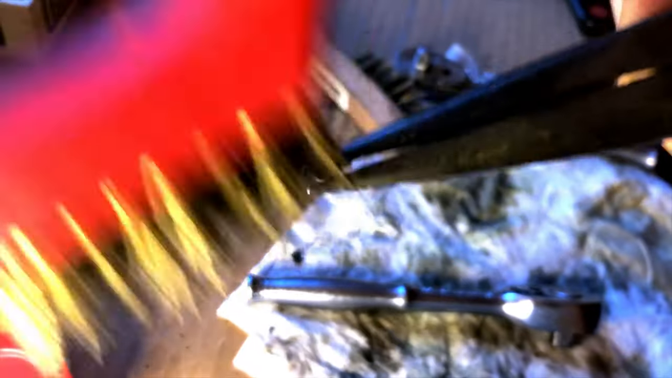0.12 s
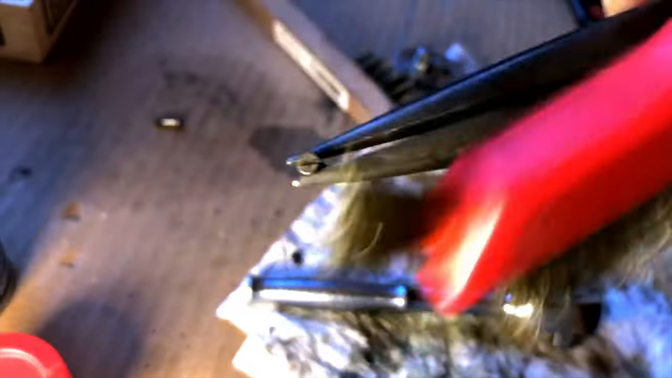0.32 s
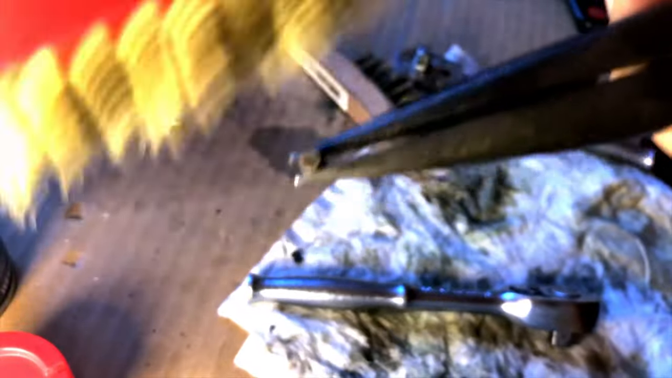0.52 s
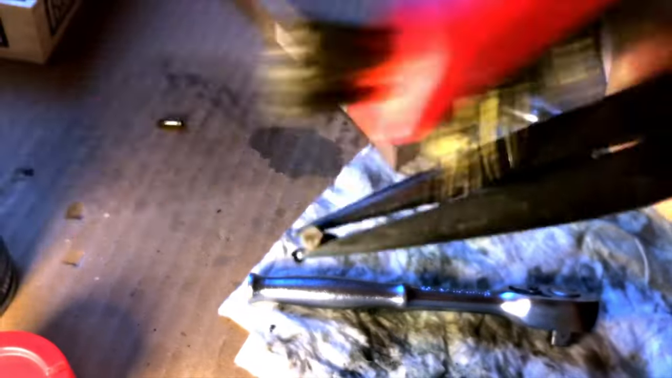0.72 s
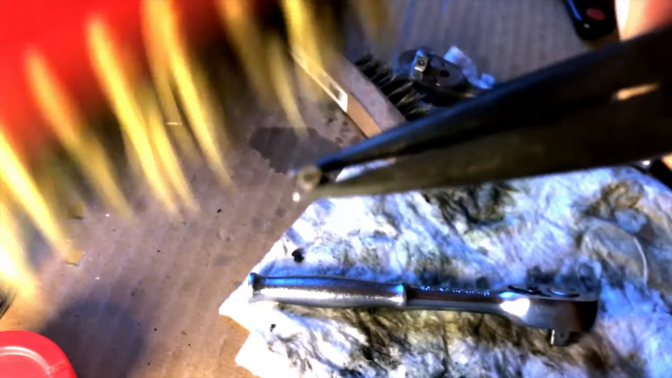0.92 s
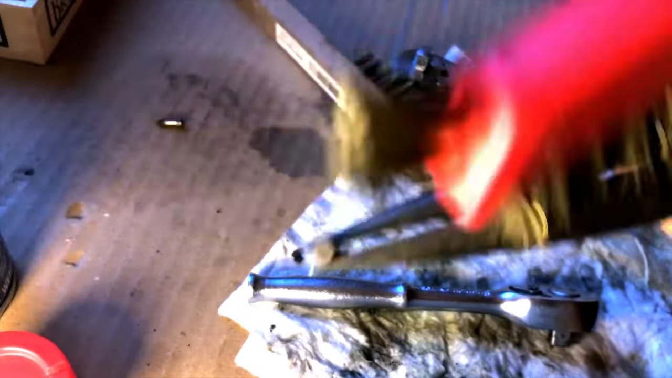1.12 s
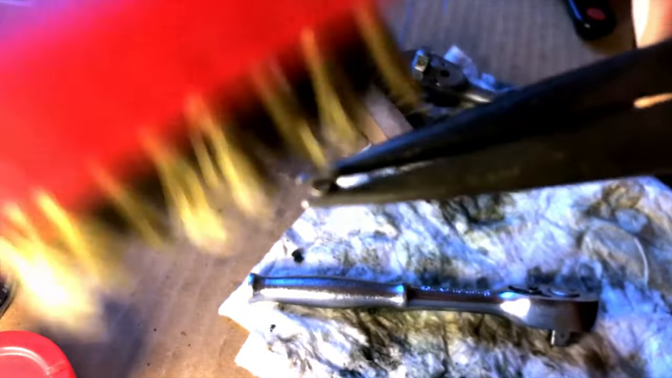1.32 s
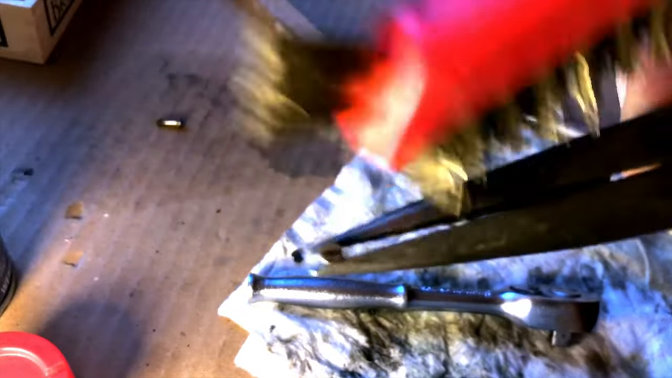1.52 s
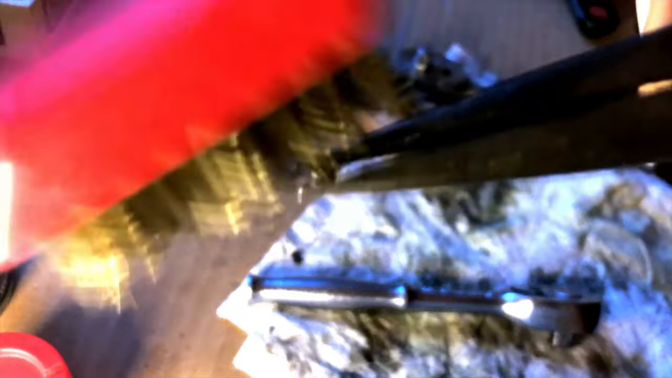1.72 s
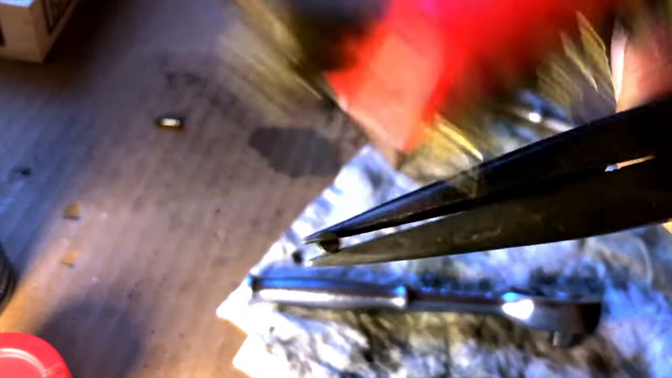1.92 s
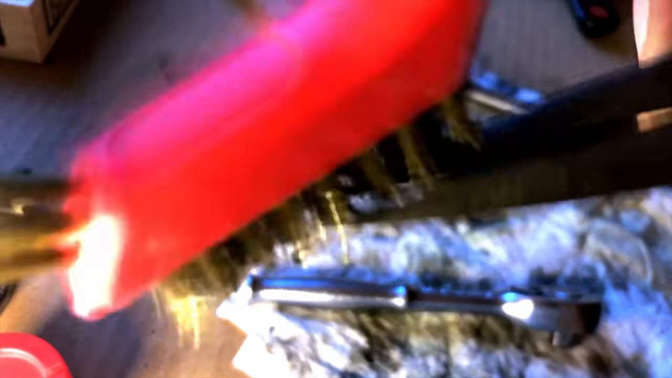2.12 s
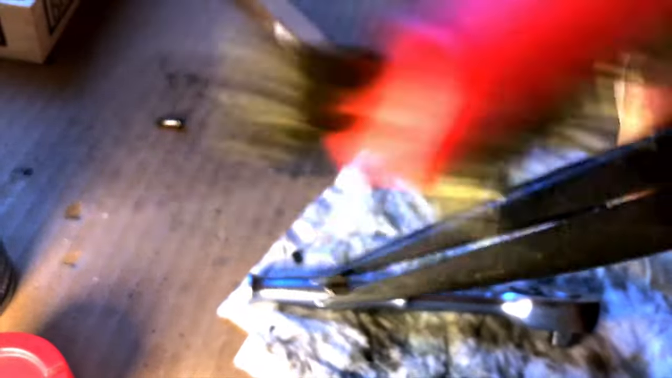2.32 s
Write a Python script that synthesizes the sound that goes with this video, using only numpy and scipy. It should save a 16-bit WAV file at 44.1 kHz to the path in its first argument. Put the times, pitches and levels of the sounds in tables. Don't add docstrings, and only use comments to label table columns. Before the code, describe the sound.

Close, dry scratching of brass wire bristles on a small metal screw: a weak first graze, a sharp handle click, then five even raspy strokes, each starting with a slap and knock, in a quiet workshop.

```python
import sys
import numpy as np
from scipy import signal
from scipy.fft import rfft, irfft, next_fast_len
from scipy.io import wavfile
from scipy.ndimage import uniform_filter1d, map_coordinates

SR = 44100
rng = np.random.default_rng(int(sys.argv[2]) if len(sys.argv) > 2 else 0)


def master_out(mix):
    frames = np.transpose(np.atleast_2d(mix))
    ceiling = np.clip(frames, -1, 1)
    pcm = np.round(ceiling * 32767).astype(np.int16)
    wavfile.write(sys.argv[1], SR, pcm)


def linear_from_db(decibels):
    return 10 ** (np.asarray(decibels, float) / 20)


N = 110250
T_S = np.arange(N) / SR


def unit(x):
    return x / np.sqrt(np.mean(x ** 2) + 1e-20)


def filtered(x, response):
    size = next_fast_len(N + SR // 2)
    spectrum = rfft(x, size) * response(np.fft.rfftfreq(size, 1 / SR))
    return irfft(spectrum, size)[:N]


def colour(points):
    freq_hz, level_db = np.transpose([(5, -120), *points, (SR, -120)])
    return lambda hz: linear_from_db(np.interp(np.log(hz + 1), np.log(freq_hz), level_db))


def noise(points):
    return unit(filtered(rng.standard_normal(N), colour(points)))


def body(peaks):
    def response(f):
        total = 0
        for k, (freq_hz, width_hz, level_db) in enumerate(peaks):
            damping = 1j * f * width_hz
            total = total + (-1) ** k * linear_from_db(level_db) * damping / (freq_hz ** 2 - f * f + damping)
        return total
    return response


def wobble(rate_hz):
    return map_coordinates(rng.standard_normal(N // 10), [np.arange(N) * rate_hz / SR])


def snaps(rate_hz, spread_db, biggest=3.5):
    slips = rng.random(N) < rate_hz / SR
    size = np.minimum(rng.exponential(size=N), biggest)
    sign = np.sign(rng.standard_normal(N))
    return unit(slips * linear_from_db(spread_db * size) * sign)


def pressure(tables):
    return sum(linear_from_db(np.interp(T_S, *np.transpose(rows), left=-200, right=-200)) for rows in tables)


# freq_hz, level_db (per Hz)
RUMBLE = [(25, -38), (60, -12.5), (85, -21.5), (150, -1.5), (260, -6), (340, -9.5), (480, -21), (700, -29)]
HISS = [(500, -44.5), (800, -2.5), (1050, 1.5), (1350, 2), (1700, -7.5), (2500, -13.5), (5000, -22.5),
        (16000, -31.5)]


def air():
    rumble_db = -43.5 + 1.17 * wobble(8.9)
    hiss_db = -56 + 1.8 * wobble(1.7)
    return linear_from_db(rumble_db) * noise(RUMBLE) + linear_from_db(hiss_db) * noise(HISS)


# start_s, length_s, tips_db, shank_db
LANDINGS = [(0.1508, 0.0032, -42, -51), (0.1565, 0.01, -45, -48), (0.328, 0.0025, -56, -46),
            (0.364, 0.0094, -57.5, -52.5), (0.592, 0.0099, -32.5, -39), (0.605, 0.0032, -48, -40),
            (0.9944, 0.0018, -35.5, -30.5), (0.9964, 0.0075, -32, -25.5), (1.3716, 0.0085, -30, -36),
            (1.7369, 0.0065, -29, -46), (1.761, 0.0066, -35, -55), (2.129, 0.0069, -20.5, -22)]
# freq_hz, level_db
TIPS = [(3000, -20), (6000, -7.5), (8000, -9), (10000, -2), (12000, -6), (16500, -18.5)]
# freq_hz, level_db
SHANK = [(600, -25.5), (1500, -17), (3200, 7), (4500, -13), (6000, 4), (9000, -14)]
# freq_hz, width_hz, level_db
WIRES = [(1300, 220, 8), (3200, 900, -10.5), (4200, 300, 2), (5850, 860, 2), (6520, 200, -9.5),
         (7430, 170, 1), (8140, 650, 1.5), (9250, 270, 3.5), (9850, 280, 5.5), (11050, 300, 2),
         (11600, 430, -2.5), (13000, 400, -4.5), (14400, 430, 0.5)]


def slaps():
    tips, shank = np.zeros(N), np.zeros(N)
    for start_s, length_s, tips_db, shank_db in LANDINGS:
        progress = np.clip((T_S - start_s) / length_s, 0, 1)
        swell = np.sin(np.pi * progress ** 1.4) ** 2
        tips += linear_from_db(tips_db) * swell
        shank += linear_from_db(shank_db) * swell
    slap = tips * noise(TIPS) + shank * noise(SHANK)
    metal = body(WIRES)
    return filtered(slap, lambda hz: 0.85 + 0.81 * metal(hz))


# time_s, level_db
GRAZE = [
    [(.166, -67), (.178, -59.5), (.19, -54), (.2, -53.5), (.213, -55), (.216, -59)],
    [(.226, -58), (.25, -58), (.3, -69), (.318, -65), (.326, -53), (.34, -56.5), (.362, -56), (.374, -60.5),
     (.378, -67.5)],
]
# time_s, level_db
STROKES = [
    [(.601, -52), (.613, -43), (.63, -42), (.68, -40), (.706, -48.5), (.711, -55), (.735, -47.5),
     (.757, -56), (.782, -68)],
    [(1.004, -47), (1.012, -39.5), (1.035, -40), (1.065, -37.5), (1.085, -45.5), (1.134, -52), (1.142, -69),
     (1.15, -72.5)],
    [(1.381, -41), (1.398, -44.5), (1.41, -42), (1.48, -41.5), (1.505, -49.5), (1.525, -64.5), (1.545, -76)],
    [(1.745, -40), (1.751, -48), (1.76, -42.5), (1.85, -41), (1.862, -40), (1.91, -52), (1.922, -62.5),
     (1.935, -83)],
    [(2.136, -51), (2.143, -47), (2.146, -38.5), (2.236, -38.5), (2.239, -41), (2.28, -49.5), (2.298, -64),
     (2.315, -70)],
]
# time_s, extra_pressure_db
TUFTS = [(.634, 3), (0.658, -1), (0.667, 2), (0.695, 4), (0.704, 4.5), (.74, 4), (1.016, 8.5), (1.057, 0.5),
         (1.131, 2), (1.401, 4.5), (1.406, 5.5), (1.419, 6), (1.448, 5), (1.468, 7.5), (1.782, 3),
         (1.79, 7), (1.803, 5), (1.822, 9.5), (1.841, 8), (1.864, -3.5), (1.872, -6), (2.146, 6), (2.16, 5),
         (2.192, -3), (2.206, 3.5), (2.214, 0), (2.235, -1)]
# freq_hz, level_db
SCRATCH = [(300, -14.5), (900, 4.5), (2000, 8), (5000, 1.5), (10000, 3), (16000, 0.5)]


def brush():
    snaps_per_s, snap_spread_db, hiss_db = 5000, 1.5, -1.5
    tuft_rise_s = 0.0017
    flare_db, drift_db, ring_db = 2.5, 1.2, 6.5
    slips = unit(snaps(snaps_per_s, snap_spread_db) + linear_from_db(hiss_db) * rng.standard_normal(N))

    catch_db = np.zeros(N)
    for time_s, extra_db in TUFTS:
        u = np.clip(T_S - time_s + tuft_rise_s, 0, 1) / tuft_rise_s
        catch_db += extra_db * u * np.exp(1 - u)
    uneven_db = 0.7 * wobble(110) + 1.4 * wobble(350)
    push = linear_from_db(catch_db + uneven_db) * pressure(STROKES + GRAZE)

    flares = [linear_from_db(flare_db * wobble(110) + drift_db * wobble(6.76)) for _ in WIRES]

    def metal(drive):
        ring = sum(filtered(drive * flare, body([mode])) for mode, flare in zip(WIRES, flares))
        return filtered(drive, colour(SCRATCH)) + linear_from_db(ring_db) * ring

    return metal(slips * push) / np.std(metal(slips))


# freq_hz, level_db, t60_s
CLICK = [(313, -9.5, 0.02), (479, -17, .015), (800, -23, 0.008), (1285, -5.5, 0.011), (1662, -17.5, 0.023),
         (2136, -11, 0.012), (2730, -8, 0.0038), (3170, 2.5, 0.0039), (3706, -10.5, 0.0071),
         (5920, -20.5, 0.011), (7250, -20.5, 0.01), (9720, -30.5, 0.013), (11980, -38, .02),
         (14100, -37, .008)]
# freq_hz, level_db
CRACK = [(450, -4), (4000, -6), (8000, -6), (14000, -27)]


def click():
    start_s, rise_cycles = 0.21702, 0.85
    crack_db, crack_t60_s, crack_rise_s = -15, 0.017, 0.00034
    t = np.clip(T_S - start_s, 0, 1)
    ring = np.zeros(N)
    for freq_hz, level_db, t60_s in CLICK:
        rise = 1 - np.exp(-(t * freq_hz / rise_cycles) ** 2)
        ring -= linear_from_db(level_db + 3 - 60 * t / t60_s) * np.sin(2 * np.pi * freq_hz * t) * rise
    crack_gain = linear_from_db(crack_db - 60 * t / crack_t60_s) * (1 - np.exp(-t / crack_rise_s))
    return ring + crack_gain * noise(CRACK)


# time_s, level_db
DRAG = [(.226, -42), (.246, -42), (.252, -40.5), (.268, -38.5), (.278, -40), (.298, -43), (.304, -39),
        (.319, -47), (.345, -52)]
# freq_hz, width_hz, level_db
HANDLE = [(594.4, 300, -15.5), (950, 177, -5), (1180, 150, 2), (1350, 150, 3.5), (1944, 920, -9.5),
          (2770, 250, -9.5), (3830, 2200, -18)]


def drag():
    slips_per_s, spread_db, top_hz, level_db = 2600, 3, 5110, 6.0
    slips = snaps(slips_per_s, spread_db) * linear_from_db(2.3 * wobble(120.1))
    plastic = body(HANDLE)
    soft = lambda hz: plastic(hz) / (1 + 1j * hz / top_hz) ** 2
    return linear_from_db(level_db) * filtered(slips * pressure([DRAG]), soft) / np.std(filtered(slips, soft))


# start_s, level_db, pitch_hz
KNOCKS = [(.32, -28.5, 1158), (.596, -31.5, 1287), (0.9933, -39.5, 1300), (0.999, -20, 1245),
          (1.3746, -26.5, 1378), (1.7395, -26, 1278), (1.759, -34.5, 1300), (2.1307, -16, 1307),
          (.596, -36, 3290), (0.595, -43.5, 2750), (.596, -45.5, 4400), (1.741, -44.5, 3310),
          (.596, -35, 6040), (1.0, -30.5, 2800), (1.0, -29.5, 5900), (1.3755, -33, 3700), (1.74, -43, 5920),
          (2.131, -27.5, 3210), (2.13, -36, 4680)]


def knocks():
    handle_rise_s, jaw_rise_s = 0.002, 0.00114
    out = np.zeros(N)
    for start_s, level_db, pitch_hz in KNOCKS:
        rise_s = handle_rise_s if pitch_hz < 2000 else jaw_rise_s
        u = np.clip(T_S - start_s, 0, 1) / rise_s
        swell = (u * np.exp(1 - u)) ** 1.8
        out += linear_from_db(level_db) * swell * np.sin(2 * np.pi * pitch_hz * (T_S - start_s))
    return out


def room(x):
    delay_samples, t60_s, top_hz = 200, 0.11, 4000
    t = np.arange(SR // 3) / SR
    tail = rng.standard_normal(len(t)) * linear_from_db(-60 * t / t60_s)
    wet = signal.fftconvolve(np.pad(x, (delay_samples, 0)), tail / np.linalg.norm(tail))[:N]
    return filtered(wet, lambda hz: 1 / (1 + 1j * hz / top_hz))


def scene():
    bass_cut_hz, room_db = 120, -23
    contact = slaps() + brush() + click() + drag() + knocks()
    near = filtered(contact, lambda hz: (1j * hz / (bass_cut_hz + 1j * hz)) ** 2)
    return (near + linear_from_db(room_db) * room(near) + air())[None]


def low_pass(x):
    return signal.sosfilt(signal.butter(12, 16810, fs=SR, output="sos"), x)


def record(dry):
    ceiling, top_hz, sharp_top_hz, edge_hz = 1.05, 15900, 16800, 150
    sharp_db, sharp_rise_db, sharp_lag_s = -42, 13, 0.008
    held = dry[0] / (1 + np.abs(dry[0] / ceiling) ** 8) ** (1 / 8)

    def below(limit_hz):
        slope = lambda hz: np.clip((hz - limit_hz) / edge_hz + 0.5, 0, 1)
        return filtered(held, lambda hz: np.cos(np.pi / 2 * slope(hz)) ** 2)

    treble = filtered(held, lambda hz: np.clip(hz / 5000 - 0.5, 0, 1))
    bright = np.abs(uniform_filter1d(treble ** 2, size=200))
    earlier = np.roll(bright, round(sharp_lag_s * SR))
    attack = (bright > linear_from_db(2 * sharp_db)) & (bright > linear_from_db(2 * sharp_rise_db) * earlier)
    opening = uniform_filter1d(1. * attack, size=200)
    steady = below(top_hz)
    mix = steady + opening * (below(sharp_top_hz) - steady)
    return low_pass(mix[None])


dry = scene()
out = record(dry)
master_out(out)
```